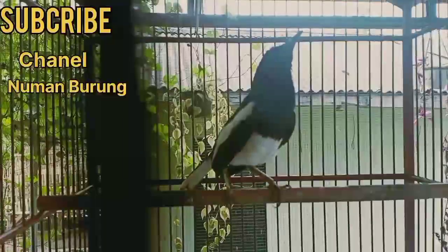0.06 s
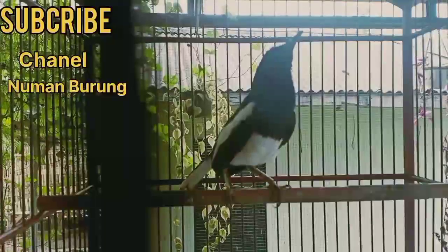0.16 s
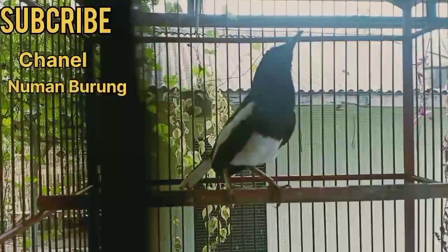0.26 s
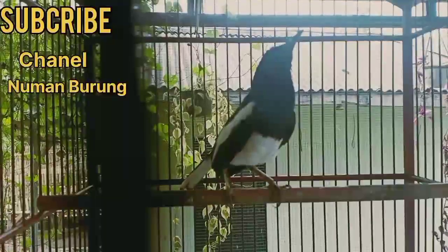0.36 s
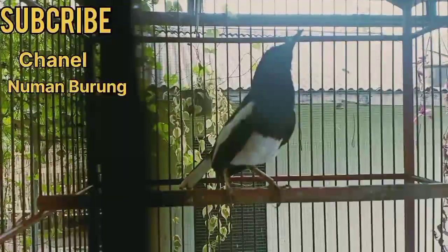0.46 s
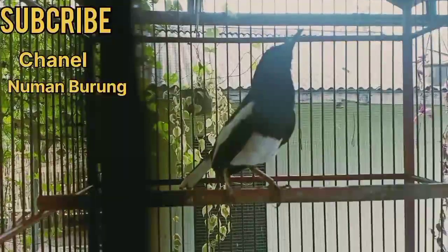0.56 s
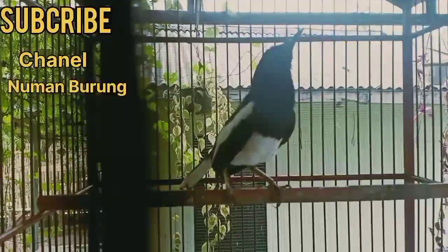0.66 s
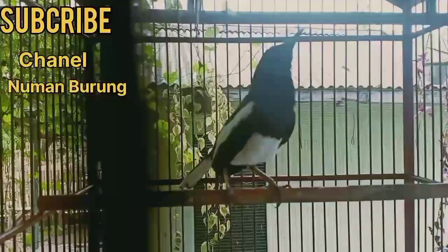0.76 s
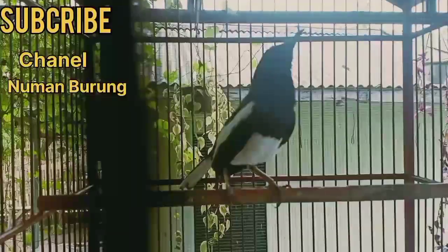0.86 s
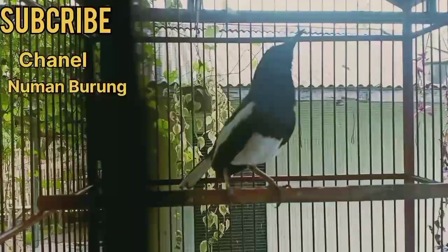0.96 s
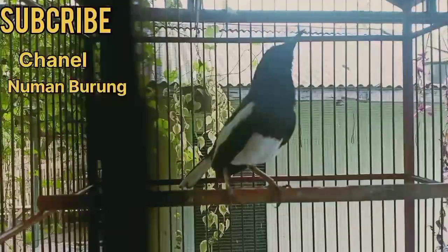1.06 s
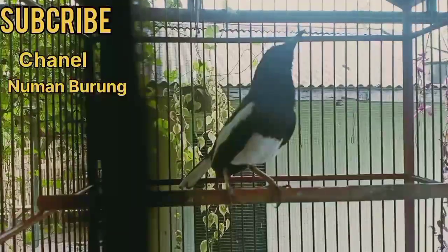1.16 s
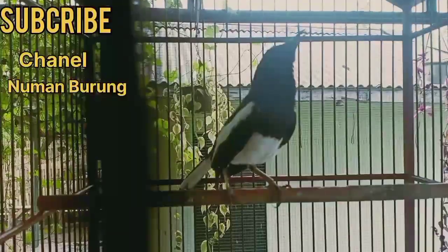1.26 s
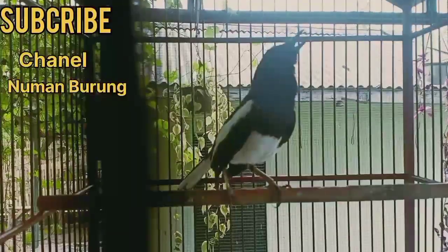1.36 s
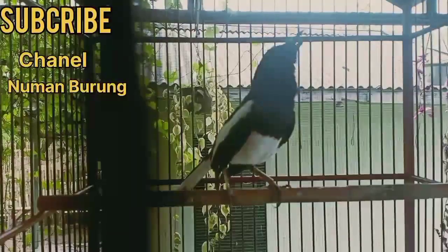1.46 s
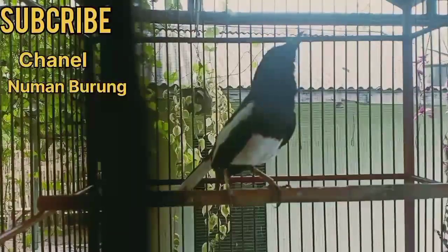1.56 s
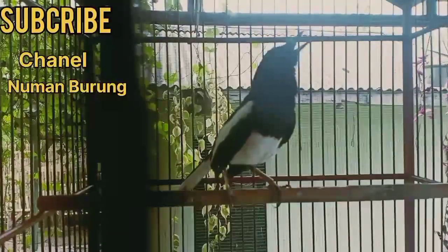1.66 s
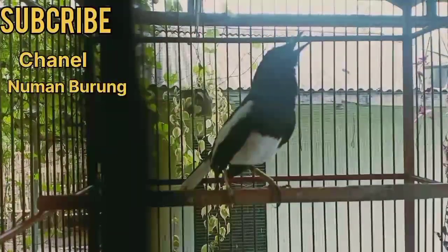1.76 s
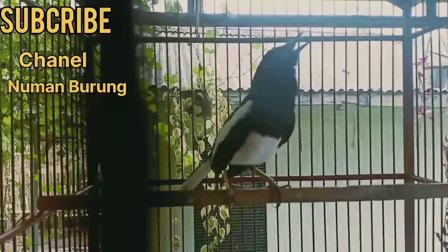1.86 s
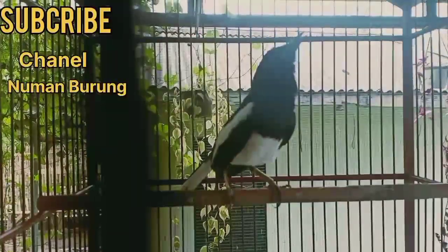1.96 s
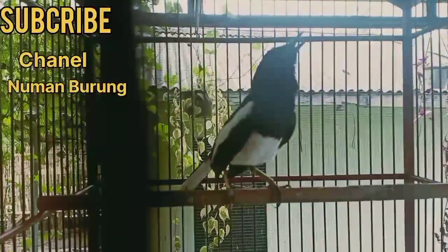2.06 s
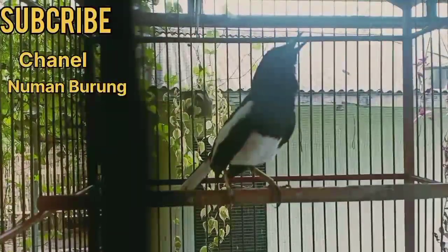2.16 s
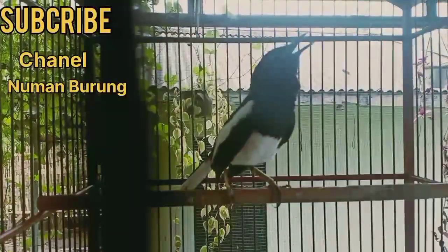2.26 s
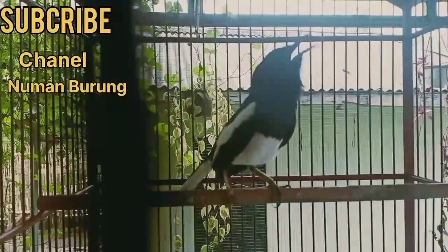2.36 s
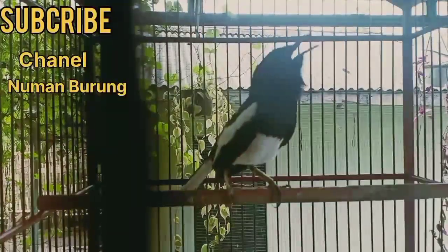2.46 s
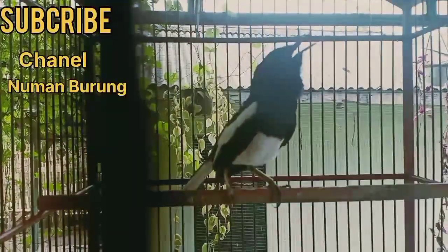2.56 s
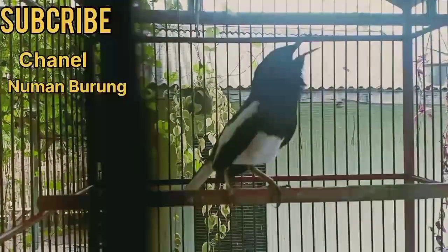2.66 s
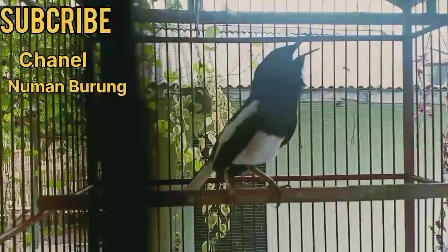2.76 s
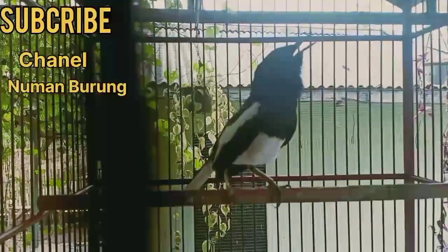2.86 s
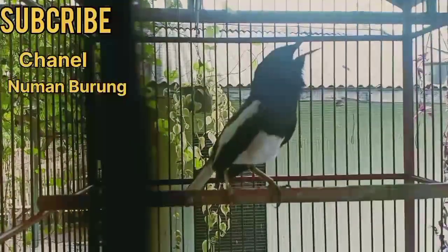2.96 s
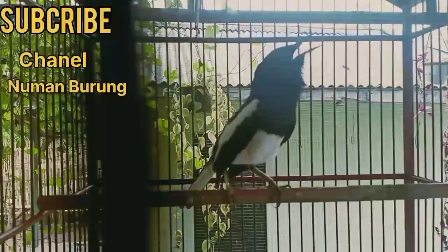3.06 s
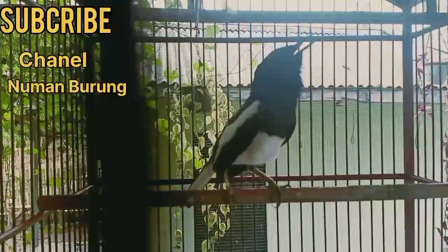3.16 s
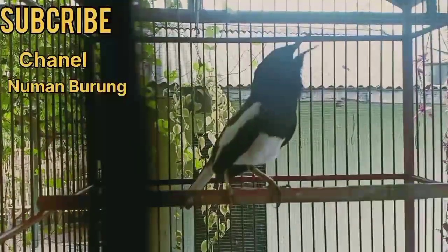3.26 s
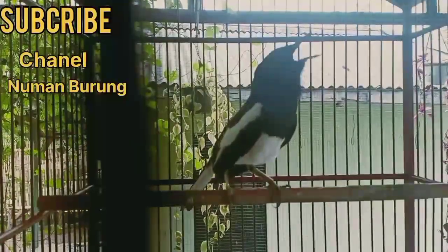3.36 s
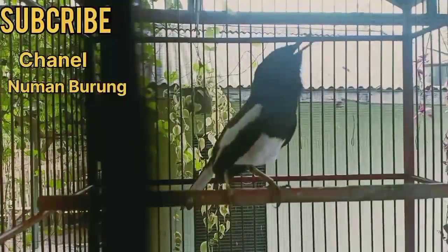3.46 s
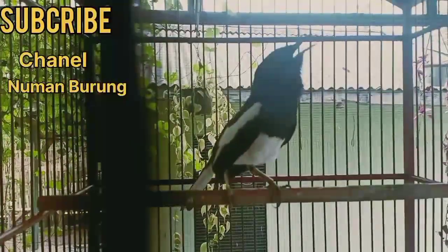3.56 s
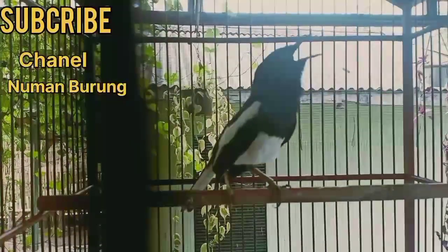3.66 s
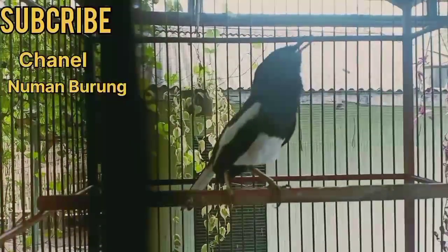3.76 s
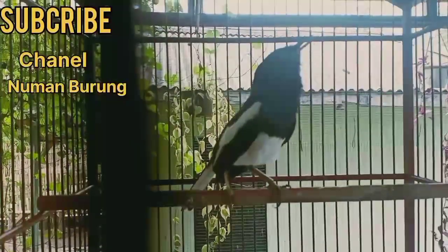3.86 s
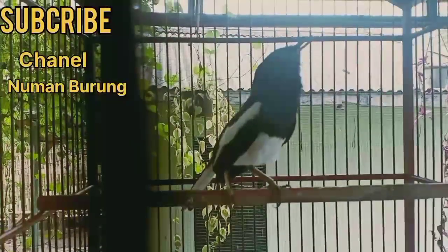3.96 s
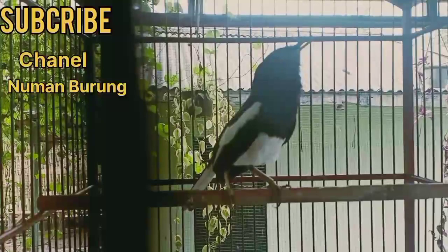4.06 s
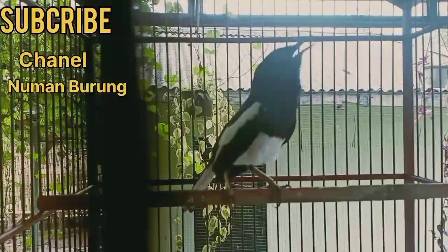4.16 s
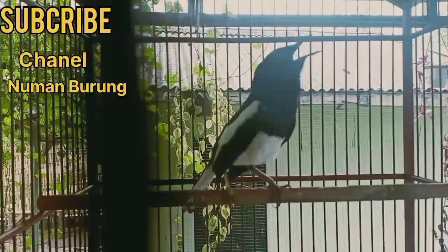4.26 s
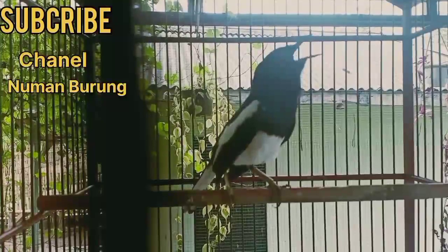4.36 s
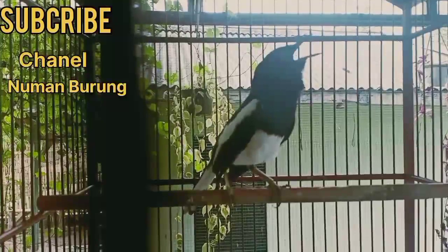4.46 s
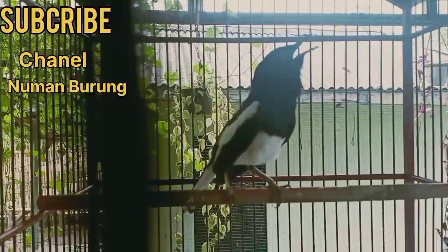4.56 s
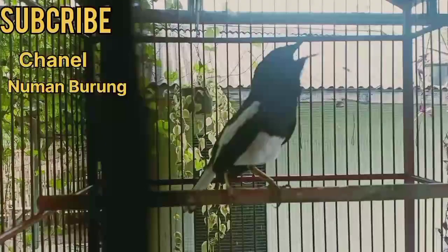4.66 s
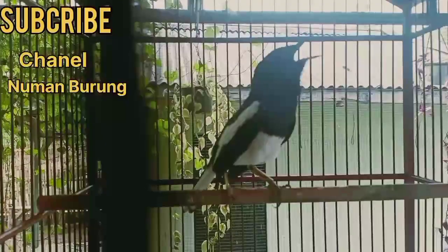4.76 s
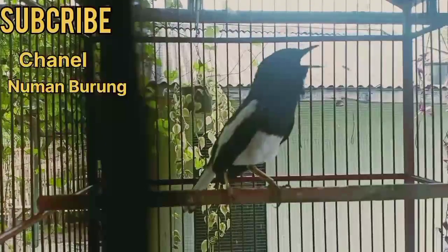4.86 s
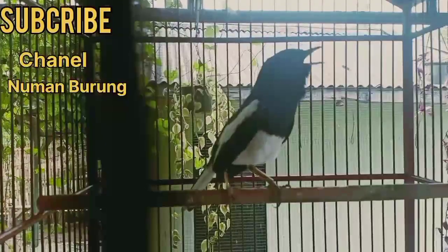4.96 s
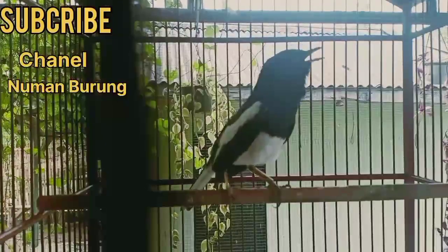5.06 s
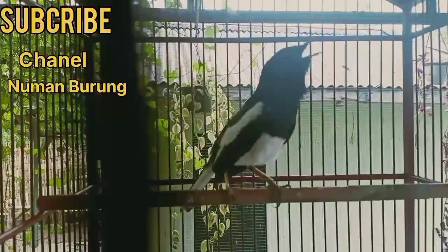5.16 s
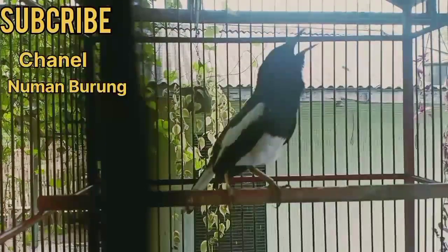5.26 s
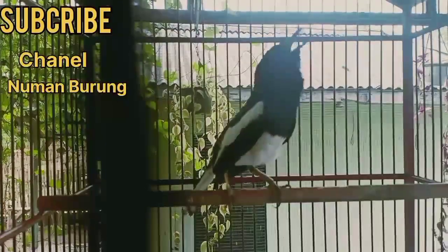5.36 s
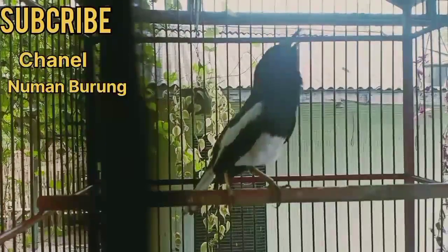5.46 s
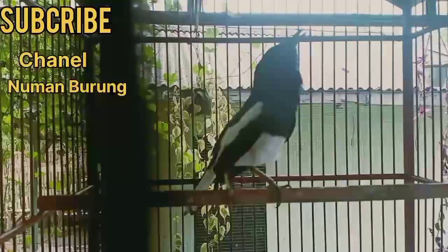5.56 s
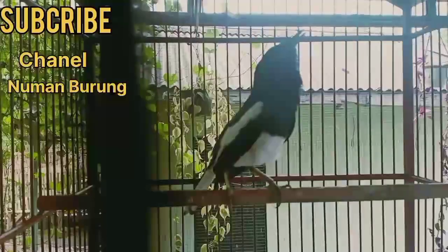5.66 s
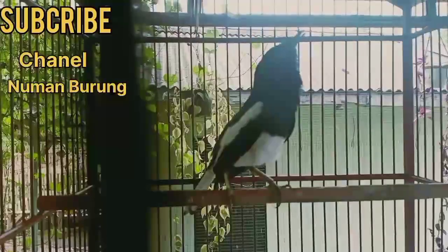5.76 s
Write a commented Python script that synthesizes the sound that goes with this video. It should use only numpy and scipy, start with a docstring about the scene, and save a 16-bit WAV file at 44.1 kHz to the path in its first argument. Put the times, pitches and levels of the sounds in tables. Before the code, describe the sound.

Loud, varied birdsong on a porch: raspy buzzes, a pure whistle, then rapid high hooks and slides, over faint outdoor hum.

```python
"""On a porch, a caged magpie-robin sings close by: two-voiced buzzes, a whistle, swoops, hooks and falling slurs.
Each side of its syrinx makes one tone; sounding together they breed sum and difference tones and rasp.
Its bill ticks. A second bird slurs, chirps and rattles farther off, heard mostly by random-tap echoes.
Beneath lie a faint outdoor hum, made of filtered noise, and a motor's low sines, fading in near the end."""
import sys
import numpy as np
from scipy import signal
from scipy.fft import rfft, irfft
from scipy.io import wavfile
from scipy.ndimage import uniform_filter1d

SR = 44100
rng = np.random.default_rng(int(sys.argv[2]) if len(sys.argv) > 2 else 0)


def inscribe(sig):
    """Save sig as 16-bit PCM at rate SR to the path in sys.argv[1].

    A 1-D sig is mono; a 2-D sig holds one channel per row.
    Samples are clipped to [-1, 1] before scaling.
    """
    pcm = np.round(np.clip(np.atleast_2d(sig).T, -1, 1) * 32767)
    wavfile.write(sys.argv[1], SR, pcm.astype(np.int16))


N = 256220
TIME, BINS_HZ = np.arange(N) / SR, np.fft.rfftfreq(N, 1 / SR)

# High side, buzzes: (time [s], length [s], scoop [Hz], pitch [Hz], end pitch [Hz], level [dB], attack [s], timbre)
BUZZES = [ (1.309, 0.19, -80, 3343, 3338, -15.5, 0.028, "bright"),
          (2.092, 0.24, 125.5, 3218, 3125, -15.5, .035, "harsh"),
          (2.418, 0.18, -130, 2967, 2913, -10, 0.0091, "churr"),
          (2.69, 0.16, -240, 3010, 3015, -11, .007, "churr"),
          (2.965, 0.18, -250, 3060, 2847, -10, 0.0055, "churr")]
SETTLE_S, BUZZ_RELEASE_S = 0.0046, 0.021  # the scoop's time constant is the attack plus SETTLE_S
# High side, pure whistle: (time [s], pitch [Hz], level [dB])
WHISTLE = [(1.659, 3430, -21), (1.679, 3406, -14), (1.743, 3400, -11), (1.769, 3438, -14.5),
           (1.825, 3462, -11), (1.921, 3394, -15), (1.928, 3390, -16.5)]
# High side, swoops: (time [s], length [s], time to top [s], time to dip [s], scoop [Hz], top [Hz], dip [Hz],
# level in the dip [dB])
SWOOPS = [(3.31, 0.14, .037, .106, -650, 3428, 2836, -11.5),
          (3.598, 0.1378, 0.027, .116, -120, 3472, 2740, -11.5)]
SWOOP_SCOOP_S, SWOOP_ATTACK_S, SWOOP_RELEASE_S, SWOOP_TOP_DB = 0.0072, 0.03, 0.033, -9
UPTURN_HZ_PER_S2 = 640000  # swoops and slurs curl up after their lowest point
# High side, slurs: (time [s], length [s], start [Hz], lowest [Hz], bend of the fall [exponent],
# level before the fade [dB], attack [s])
SLURS = [(4.377, .191, 4790, 3485, 2.9, -6, 0.083), (4.804, .197, 5220, 3355, 2.42, -8.5, 0.043)]
SLUR_TURN_S, SLUR_RELEASE_S, SLUR_FADE_DB_PER_S = 0.016, 0.005, -23.5  # turn: time before the end
# High side, hooks: (time [s], length [s], time to low point [s], start [Hz], lowest [Hz],
# level before strain [dB], attack [s])
HOOKS = [ (4.225, 0.067, 0.02, 5174, 5047, -12, 0.003), (4.289, .031, 0.012, 5250, 4905, -16, 0.0023),
         (4.33, 0.041, 0.03, 4970, 4483, -8.5, 0.044), (4.679, 0.099, .027, 5240, 5052, -7, 0.022),
         (4.757, 0.037, 0.016, 5190, 5087, -7, 0.003), (5.158, 0.074, .026, 4950, 4870, -14, 0.029),
         (5.227, .044, .02, 5260, 5050, -11, 0.016), (5.272, 0.045, 0.023, 5250, 4626, -14, 0.024),
         (5.331, .037, .027, 4930, 4010, -16, 0.0029), (5.371, 0.04, 0.018, 4550, 3616, -15.5, 0.0047),
         (5.416, 0.034, 0.015, 4200, 3373, -19, 0.0022), (5.463, 0.04, 0.018, 4200, 3380, -24, 0.0042)]
FLICK_SHARE, FLICK_HZ_PER_S, HOOK_RELEASE_S = 0.17, 58000, 0.0076  # flick height as a share of lowest pitch
STRAIN_HZ, STRAIN_DB_PER_HZ = 4850, -0.015
ONSET_GAIN = 0.19  # share of full strength at which a note starts
# Low side, in buzzes and swoops: (time [s], length [s], start [Hz], settled [Hz], settled level [dB])
LOW_NOTES = [ (1.326, .183, 1885, 1787, -26), (2.114, 0.205, 1811, 1755, -26),
             (2.446, .158, 1885, 1662, -32.5), (2.719, 0.13, 1922, 1772, -30.5),
             (2.995, 0.162, 1966, 1698, -34), (3.331, 0.085, 1897, 1690, -55),
             (3.629, 0.057, 1550, 1487, -55.5)]
SAG_S, SAG_DB_PER_HZ, LOW_ATTACK_S, LOW_RELEASE_S = 0.065, 0.0628, 0.041, 0.0041  # louder while sharp
# Bouts of catching: (first catch [s], last catch [s], depth [0-1], 1/e half-width of a catch [s])
CATCH_BOUTS = [(2.473, 2.509, 0.8, .004), (2.725, 2.804, 1, 0.0052), (3.001, 3.05, .68, .0042)]
CATCH_EVERY_S = 0.0165  # approximate: each bout is divided evenly
CATCH_SHARE = 0.34  # how much of each catch the low side shares
JITTER_RAD, SHIMMER_SHARE = 0.1, 0.09
# Timbres: name -> (octave [dB], higher overtones [dB], sum tone [dB], sidebands [dB], rasp [dB]), relative:
# the first two to the high side, the rest to the low
TIMBRES = { "bright": (-18.5, -28, 4.5, -3.5, -5.5), "harsh": (-23, -31, -4.5, 0, -7.5),
           "churr": (-31.5, -51, -8.5, -5, -12.5), "swoop": (-17, -23.5, 27, 1, 11.5),
           "whistle": (-20.5, -22, -30, -30, -30), "slur": (-27.5, -29, -30, -30, -30),
           "hook": (-23, -32, -30, -30, -30)}
# Tones bred by both sides: (multiple of high pitch, multiple of low pitch)
MIXES = [(2, -2), (2, -1), (1, 2), (-1, 3), (-1, 4), (1, -1)]
# Relative levels of those tones: [dB]
MIXES_DB = [1.5, -7, -10.5, -21.5, -50, -22.5]
# Colour of octave and overtones: (frequency [Hz], gain [dB])
OVERTONE_COLOUR = [(5600, 7), (6900, 0.5), (7700, -8), (9000, -13), (10200, -9.5), (11200, 3), (12400, -11),
                   (13700, -1), (15500, -4.5)]
# Colour of the rasp noise before levelling: (frequency [Hz], relative level [dB])
RASP_COLOUR = [(1300, -52), (1900, 9), (3000, 5.5), (5000, 10.5), (7000, 2), (9000, -5), (15000, -23.5)]
# Close reflections in the cage; sweeps throb across the cancelled pitches: (frequency [Hz], gain [dB])
CAGE = [(3630, 0), (3790, -8), (3970, 1), (4220, -6.5), (4450, 0), (5200, .5), (5600, 1.5), (6200, -0.5),
        (6800, 0)]
# Bill ticks, before the treble filter: (time [s], level [dB])
TICKS = [(4.224, -23), (4.771, -16), (4.777, -17)]
# Far bird's slur, at source: (time [s], pitch [Hz], level [dB])
FAR_SLUR = [(.243, 6390, -27), (.25, 5600, -28.5), (.265, 4490, -25.5), (.295, 3860, -33.5),
            (.335, 3200, -37.5), (.37, 2535, -23), (.44, 2270, -30.5), (.452, 2330, -40)]
# Far bird's chirps, at source: (time [s], length [s], start [Hz], end [Hz], level [dB], roughness [0-1])
FAR_CHIRPS = [ (0, 0.023, 1928, 2056, -36, 0.54), (0.061, 0.083, 3080, 3186, -35, 0.21),
              (.139, 0.011, 3160, 4730, -32, 0.38), (0.486, 0.029, 4900, 6350, -37, 0.25),
              (0.512, 0.009, 2750, 4600, -30, 0.42), (0.522, .032, 4885, 4400, -25, 0.77),
              (0.735, 0.023, 1570, 2133, -39.5, 0.24), (0.761, 0.05, 2315, 2266, -36.5, 0.74),
              (0.949, 0.024, 3540, 3920, -30.5, 0.1), (0.966, 0.027, 3495, 2457, -29.5, .6),
              (1.126, 0.047, 2594, 2967, -32, .5), (1.505, 0.083, 2060, 2590, -36.5, 0.59),
              (1.902, 0.031, 6470, 6300, -32, .2), (1.983, 0.018, 2310, 2365, -40, .5),
              (2.065, 0.019, 2374, 2460, -37.5, 0.48), (4.531, 0.024, 6540, 6350, -34, 0.09),
              (4.598, 0.012, 4830, 5030, -33, 0.17), (5.125, 0.032, 5100, 4900, -37, 1),
              (5.322, 0.05, 5520, 5520, -31.5, 0.19)]
# The far bird's throat lifts the octave of low chirps: (pitch [Hz], octave re fundamental [dB])
FAR_OCTAVE = [(2350, 4), (2800, -8.5), (3700, -26.5)]
# Far bird's rattle, at source: (time [s], pitch [Hz], level [dB], octave re fundamental [dB])
FAR_RATTLE = [(4.1, 2335, -55.5, -1), (5.572, 2326, -50, -7), (5.651, 2262, -44, -15),
              (5.722, 2446, -45.5, -3), (5.81, 2444, -47.5, 2)]
# Porch reverberation: (frequency [Hz], T60 [s])
PORCH_T60 = [(3200, 0.77), (6000, 0.68), (14000, 0.11)]
EARLY_DB, NEAR_ECHO_DB = 11, -15
# Nearby surfaces favour one microphone: (frequency [Hz], left minus right [dB])
FAVOUR = [(1800, -4.5), (2850, -2), (3010, 0.5), (3190, -17.5), (3320, 5), (3520, 3.5), (3720, -6),
          (3930, 9), (4230, -11.5), (4550, 14.5), (4960, -6), (5070, 1), (5280, -6), (5650, 12.5),
          (7000, 3)]
# Hum spectrum before levelling: (frequency [Hz], relative density [dB per Hz])
HUM_COLOUR = [(40, -15), (65, -7), (95, -4.5), (130, 0.05), (200, -5), (380, -10), (620, -2), (1300, -11.5),
              (2400, -7), (3600, -14), (5500, -14), (8000, -26), (15000, -28)]
# Hum level before lift and waver: (time [s], level [dB])
HUM_LEVEL = [(0.0, -42.5), (0.48, -44.5), (2.07, -44), (3.12, -51), (4.77, -45), (5.04, -49), (5.8, -46)]
# Hum likeness in both microphones: (frequency [Hz], correlation [0-1])
HUM_LIKENESS = [(100, .86), (500, .55), (3000, .3)]
# Distant motor tones: (frequency [Hz], full level [dB])
MOTOR = [(129.2, -66), (193.8, -60.5), (387.6, -62), (651.4, -68)]
MOTOR_START_S, MOTOR_RISE_S = 5.06, 0.25
EDGE_HZ = 15800


def amp(db):
    """Decibels to gain."""
    return 10 ** (np.asarray(db) / 20)


def evened(x):
    """Scales to rms 1."""
    return x / np.sqrt(np.mean(x ** 2) + 1e-20)


def read(points, hz):
    """Interpolates a spectrum on a log-frequency axis."""
    point_hz, value = np.transpose(points)
    return np.interp(np.log(hz + 1), np.log(point_hz + 1), value)


def colour(x, points):
    """Filters by a spectrum in dB."""
    return irfft(rfft(x) * amp(read(points, BINS_HZ)), N)


def flutter(count, hz):
    """Low-passed random wavering of about rms 1, rolling off above hz."""
    padded = count + 4096
    bins_hz = np.fft.rfftfreq(padded, 1 / SR)
    spectrum = rfft(rng.standard_normal(padded)) / (1 + (bins_hz / hz) ** 4)
    return evened(irfft(spectrum))[:count]


def add(mix, start_s, sound):
    """Adds a sound to the mix in place."""
    part = mix[max(round(start_s * SR), 0):][:len(sound)]
    part += sound[:len(part)]


def voice(rows, t, edge_s=0.00069):
    """Phase [rad] and amplitude of one vibrating membrane, with a set rise and a few ms of ring-out."""
    s, hz, db = np.transpose(rows)[:3]
    gate = np.clip(np.minimum((t - s[0]) / edge_s, (s[-1] - t) / 0.006) + 0.5, 0, 1)
    pitch_hz = uniform_filter1d(np.interp(t, s, hz), size=130)
    level = uniform_filter1d(amp(np.interp(t, s, db)), size=50)
    phase = 2 * np.pi * np.cumsum(pitch_hz) / SR
    return phase, np.sqrt(2) * level * np.sin(np.pi / 2 * gate) ** 2


def near_bird(clean_jitter=0.015, low_octave_db=3, tug_rad=2.05):
    """Both sides of the syrinx: pure alone, buzzy and a little hoarse when they sound together."""
    low_phase, low = np.zeros(N), np.zeros(N)
    for row in LOW_NOTES:
        rows = low_note(*row)
        t = np.arange(rows[0][0] - 0.01, rows[-1][0] + 0.01, 1 / SR)
        phase, level = voice(rows, t, edge_s=0.004)
        add(low_phase, t[0], phase + JITTER_RAD * flutter(len(t), 180))
        add(low, t[0], level)
    hold, slip = catches()
    low_phase += tug_rad * uniform_filter1d(hold, size=200)  # each catch tugs at the low side too
    low *= 1 - CATCH_SHARE * (1 - hold)

    sizzle = evened(colour(rng.standard_normal(N), [(5000, -20.5), (9000, -0.5)]))
    tones, overtones, rasp = np.zeros((3, N))
    for rows, timbre in song():
        octave_db, upper_db, sum_db, side_db, rasp_db = TIMBRES[timbre]
        span = (TIME > rows[0][0] - 0.01) & (TIME < rows[-1][0] + 0.01)
        p, high = voice(rows, TIME[span])
        q, second, held, count = low_phase[span], low[span], hold[span], span.sum()
        # a loud low side unsettles the high one
        clash = np.minimum(second / amp(-32), 1)
        p = p + slip[span] + (clean_jitter + JITTER_RAD * clash) * flutter(count, 430)
        shimmer = (clean_jitter + SHIMMER_SHARE * clash) * flutter(count, 450)
        high = high * held * (1 + shimmer)

        sidebands = sum(amp(db) * np.cos(m * p + n * q) for (m, n), db in zip(MIXES, MIXES_DB))
        mixed = held * (amp(sum_db) * np.cos(p + q) + amp(side_db) * sidebands)
        low_tones = np.cos(q) + amp(low_octave_db) * np.cos(2 * q)
        tones[span] += high * np.cos(p) + second * (low_tones + mixed)

        # harmonics past Nyquist are muted
        third, fourth = (np.cos(k * p) * (k * np.gradient(p) < np.pi) for k in (3, 4))
        octave = amp(octave_db) * (1 - 0.5 * clash) * np.cos(2 * p)
        # in the clash the top overtones dissolve into a sizzle
        hiss = (amp(5.5) * clash + amp(-38.5)) * sizzle[span]
        upper = (1 - clash) * (third + amp(-6) * fourth) + hiss
        overtones[span] += high * (octave + amp(upper_db) * upper)

        air = second * amp(rasp_db) * (1 + np.cos(p - 2 * q)) / 2  # puffs at a beat of the two sides
        rasp[span] += air * (2 - held) + amp(-41) * high
    rasp_noise = evened(colour(rng.standard_normal(N), RASP_COLOUR))
    return tones + colour(overtones, OVERTONE_COLOUR) + rasp * rasp_noise


def song():
    """Every note of the high side with the name of its timbre."""
    notes = [(buzz(*row), timbre) for *row, timbre in BUZZES]
    notes += [(WHISTLE, "whistle")]
    notes += [(swoop(*row), "swoop") for row in SWOOPS]
    notes += [(slur(*row), "slur") for row in SLURS]
    return notes + [(hook(*row), "hook") for row in HOOKS]


def note(start_s, t, hz, db, attack_s, release_s):
    """Attack, hold and release on a pitch path: rows of (time [s], pitch [Hz], level [dB])."""
    ramps = [t / attack_s, (t[-1] - t) / release_s]
    rise, fall = np.sin(np.pi / 2 * np.clip(ramps, 0, 1))
    gain = (ONSET_GAIN + (1 - ONSET_GAIN) * rise) * fall
    return np.column_stack([start_s + t, hz, db + 20 * np.log10(abs(gain) + 1e-3)])


def buzz(start_s, length_s, scoop_hz, hz, end_hz, db, attack_s):
    """Scoops onto its pitch and holds it, drifting a little."""
    t = np.arange(0, length_s, 1 / SR)
    scoop = scoop_hz * np.exp(-(t / (attack_s + SETTLE_S)) ** 2)
    pitch_hz = hz + (end_hz - hz) * t / length_s + scoop
    return note(start_s, t, pitch_hz, db, attack_s, BUZZ_RELEASE_S)


def swoop(start_s, length_s, top_s, dip_s, scoop_hz, top_hz, dip_hz, db):
    """Arches softly over its top, sinks to a loud dip and turns up again."""
    t = np.arange(0, length_s, 1 / SR)
    height = np.cos(np.pi / 2 * np.clip((t - top_s) / (dip_s - top_s), 0, 1)) ** 2
    scoop = scoop_hz * np.exp(-(t / SWOOP_SCOOP_S) ** 2)
    upturn = UPTURN_HZ_PER_S2 * np.maximum(t - dip_s, 0) ** 2
    pitch_hz = dip_hz + (top_hz - dip_hz) * height + scoop + upturn
    return note(start_s, t, pitch_hz, db + SWOOP_TOP_DB * height, SWOOP_ATTACK_S, SWOOP_RELEASE_S)


def slur(start_s, length_s, start_hz, low_hz, bend, db, attack_s):
    """A long fall that levels out, slowly fading, and curls up at the very end."""
    t, turn_s = np.arange(0, length_s, 1 / SR), length_s - SLUR_TURN_S
    fall = (start_hz - low_hz) * np.maximum(1 - t / turn_s, 0) ** bend
    upturn = UPTURN_HZ_PER_S2 * np.maximum(t - turn_s, 0) ** 2
    return note(start_s, t, low_hz + fall + upturn, db + SLUR_FADE_DB_PER_S * t, attack_s, SLUR_RELEASE_S)


def hook(start_s, length_s, turn_s, start_hz, low_hz, db, attack_s):
    """A short drop, then a flick up and back; pushed past the strain pitch, the voice weakens."""
    t, height_hz = np.arange(0, length_s, 1 / SR), FLICK_SHARE * low_hz
    flick_angle = np.pi / 2 * np.clip((t - turn_s) * FLICK_HZ_PER_S / height_hz, 0, 2)
    flick = height_hz * np.sin(flick_angle) ** 2
    pitch_hz = low_hz + (start_hz - low_hz) * np.maximum(1 - t / turn_s, 0) ** 2 + flick
    strain_hz = np.maximum.accumulate(np.maximum(low_hz + flick - STRAIN_HZ, 0))
    return note(start_s, t, pitch_hz, db + STRAIN_DB_PER_HZ * strain_hz, attack_s, HOOK_RELEASE_S)


def low_note(start_s, length_s, start_hz, settled_hz, db):
    """The low side starts sharp and strong, then sags."""
    t = np.arange(0, length_s, 1 / SR)
    sharp_hz = (start_hz - settled_hz) * np.exp(-t / SAG_S)
    level_db = db + SAG_DB_PER_HZ * sharp_hz
    return note(start_s, t, settled_hz + sharp_hz, level_db, LOW_ATTACK_S, LOW_RELEASE_S)


def catches():
    """Brief, evenly spaced drop-outs of the high side; at each its phase slips by up to half a cycle."""
    dips, slip = np.zeros((2, N))
    for first_s, last_s, depth, width_s in CATCH_BOUTS:
        count = round((last_s - first_s) / CATCH_EVERY_S) + 1
        for s in np.linspace(first_s, last_s, count):
            dip = depth * np.exp(-np.minimum(((TIME - s) / width_s) ** 2, 20))
            dips += dip
            slip += np.cumsum(dip) * np.sqrt(np.pi) / (width_s * SR)
    return np.maximum(1 - dips, 0), slip


def bill(decay_s=0.00094):
    """Tiny dry ticks: decaying noise bursts, mostly treble."""
    out, t = np.zeros(N), np.arange(300) / SR
    for s, db in TICKS:
        add(out, s, amp(db) * rng.standard_normal(len(t)) * np.exp(-t / decay_s))
    return colour(out, [(3000, -24), (6000, -8)])


def far_bird():
    """A slur, harsh chirps whose pitch scatters, and a fast rattle."""
    phase, level = voice(FAR_SLUR, TIME)
    falling = level * (np.cos(phase + 0.11 * flutter(N, 440)) + amp(-24.5) * np.cos(2 * phase))
    return falling + far_chirps() + far_rattle()


def far_chirps(scatter=0.18):
    """Short glides, roughened by random pitch scatter."""
    out = np.zeros(N)
    for s, length_s, start_hz, end_hz, db, rough in FAR_CHIRPS:
        count = int(length_s * SR)
        octave_db = read(FAR_OCTAVE, (start_hz + end_hz) / 2)
        pitch_hz = np.linspace(start_hz, end_hz, count) * (1 + scatter * rough * flutter(count, 810))
        p = 2 * np.pi * np.cumsum(pitch_hz) / SR
        tone = np.cos(p) + amp(octave_db) * np.cos(2 * p)
        add(out, s, np.sqrt(2) * amp(db) * signal.windows.tukey(count, 0.4) * tone)
    return out


def far_rattle(rattle_hz=62):
    """A phase-roughened tone in fast pulses."""
    phase, level = voice(FAR_RATTLE, TIME)
    phase = phase + 1.5 * flutter(N, 430)
    s, _, _, octave_db = np.transpose(FAR_RATTLE)
    beats = evened(np.exp(3 * np.cos(2 * np.pi * rattle_hz * TIME)))
    octave = amp(np.interp(TIME, s, octave_db)) * np.cos(2 * phase)
    return level * beats * (np.cos(phase) + octave)


def porch(x, delay_s, early_db, early_decay_s):
    """Sparse echoes: a quick cluster from nearby surfaces, then a tail dying band by band."""
    taps = rng.standard_normal((2, SR)) * (rng.random((2, SR)) < 3000 / SR)  # about 3000 per second
    t = np.arange(SR) / SR
    taps *= (t > delay_s) * (1 + amp(early_db) * np.exp(-t / early_decay_s))
    hz, frame_s, bands = signal.stft(taps, SR, nperseg=256)
    decay = amp(-60 * frame_s / read(PORCH_T60, hz)[:, None])
    tail = signal.istft(bands * decay, SR, nperseg=256)[1]
    tail = tail / np.linalg.norm(tail, axis=1)[:, None]
    return signal.fftconvolve(x[None], tail, axes=1)[:, :N]


def microphones(x, lead_rad=0.79):
    """The left leads by a fixed phase at every pitch; the balance ripples with pitch at equal power."""
    ratio = amp(read(FAVOUR, BINS_HZ))
    left, right = ratio * np.exp(1j * lead_rad), np.ones(len(BINS_HZ))
    return irfft(rfft(x) * np.array([left, right]) * np.sqrt(2 / (1 + ratio ** 2)), N)


def hum(lift_db=2.5, waver_db=1):
    """Distant outdoor noise, nearly the same on both sides in the bass."""
    a, b = rfft(rng.standard_normal((2, N)))
    same = np.clip(read(HUM_LIKENESS, BINS_HZ), 0, 1)
    noise = irfft(np.array([a, same * a + np.sqrt(1 - same ** 2) * b]), N)
    level_db = lift_db + np.interp(TIME, *np.transpose(HUM_LEVEL)) + waver_db * flutter(N, 8.5)
    return evened(colour(noise, HUM_COLOUR)) * amp(level_db)


def motor(waver_rad=0.47):
    """A few faint low tones, wavering in phase."""
    tones = np.zeros(N)
    for hz, db in MOTOR:
        tones += np.sqrt(2) * amp(db) * np.cos(2 * np.pi * hz * TIME + waver_rad * flutter(N, 7.3))
    return tones * np.clip((TIME - MOTOR_START_S) / MOTOR_RISE_S, 0, 1)


def scene():
    """The near bird dry and loud, the far bird mostly as echoes, over hum and motor."""
    near, far = near_bird() + bill(), far_bird()
    beamed = colour(near, [(3400, 0), (5500, 6), (10000, 13)])  # the raised bill throws treble at the roof
    near_echo = porch(beamed, delay_s=0.005, early_db=EARLY_DB, early_decay_s=0.032)
    far_echo = porch(far, delay_s=0.002, early_db=9, early_decay_s=0.045)
    birds = microphones(colour(near, CAGE)) + amp(0.5) * far
    echoes = amp(NEAR_ECHO_DB) * near_echo + amp(4) * far_echo
    return birds + echoes + hum() + motor()


def record(dry):
    """Low-passes both channels at the band edge."""
    lowpass = signal.firwin(511, EDGE_HZ, window=("kaiser", 9), fs=SR)
    return signal.oaconvolve(dry, lowpass[None], "same")


dry = scene()
out = record(dry)
inscribe(out)
```